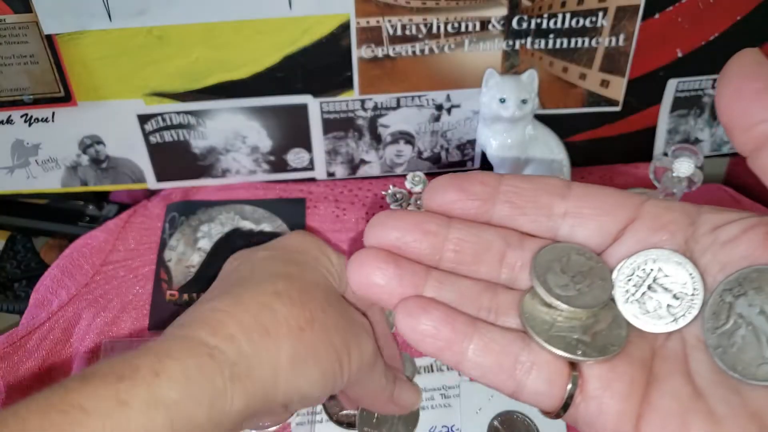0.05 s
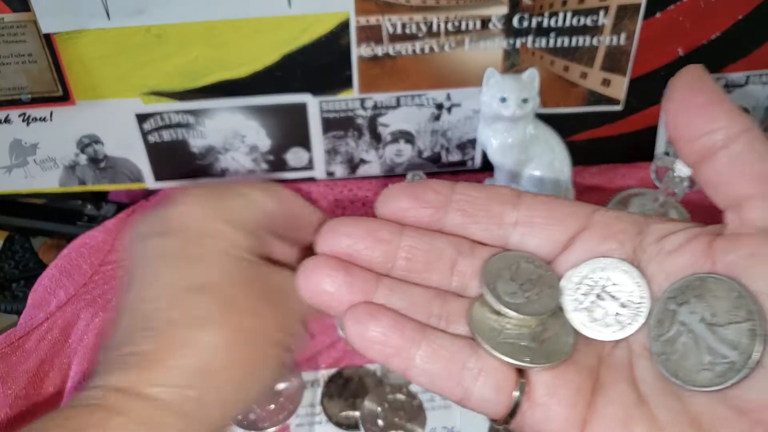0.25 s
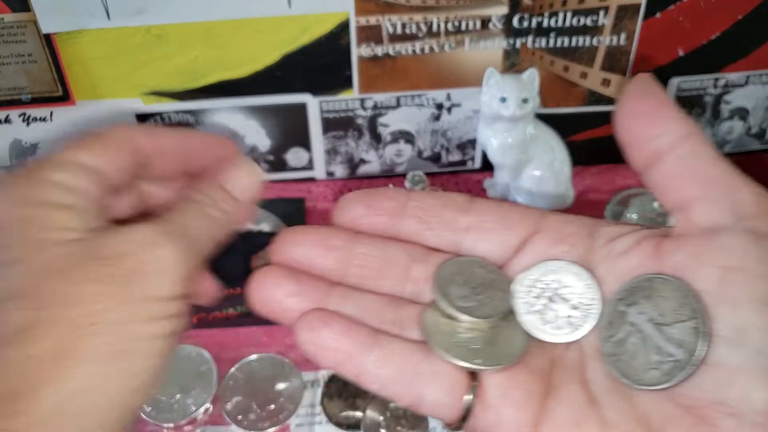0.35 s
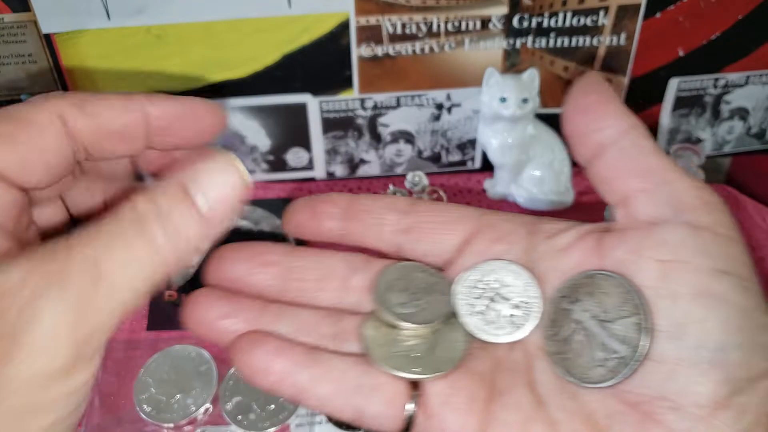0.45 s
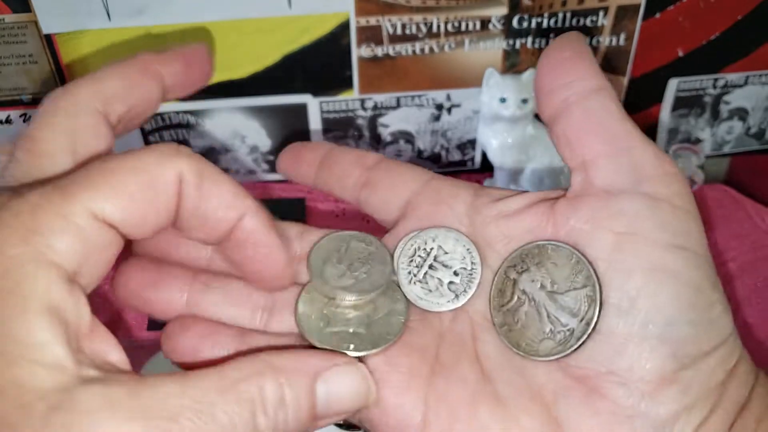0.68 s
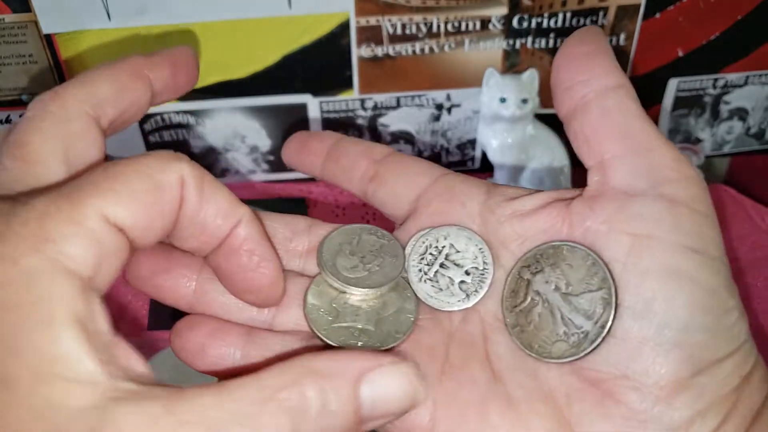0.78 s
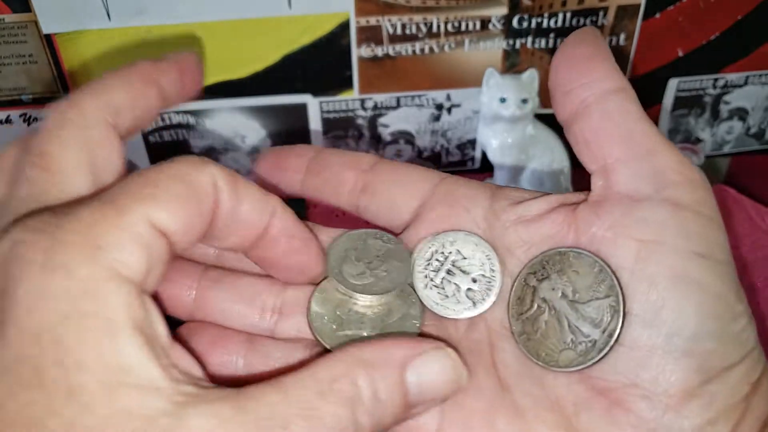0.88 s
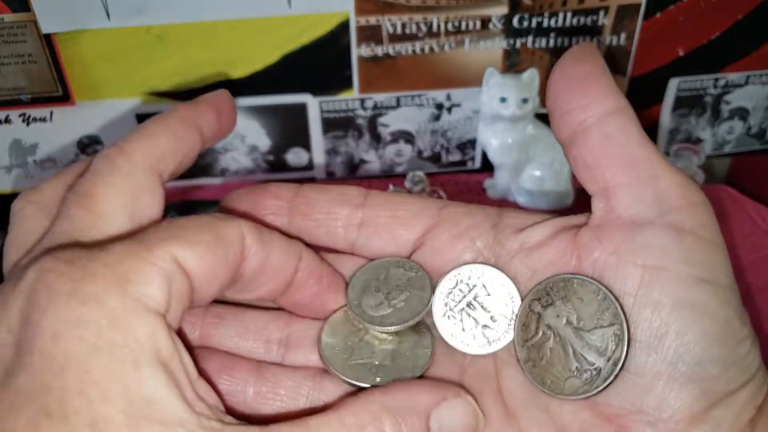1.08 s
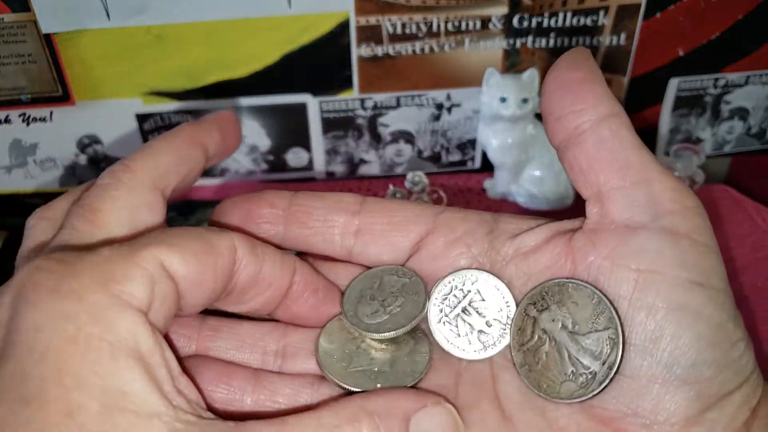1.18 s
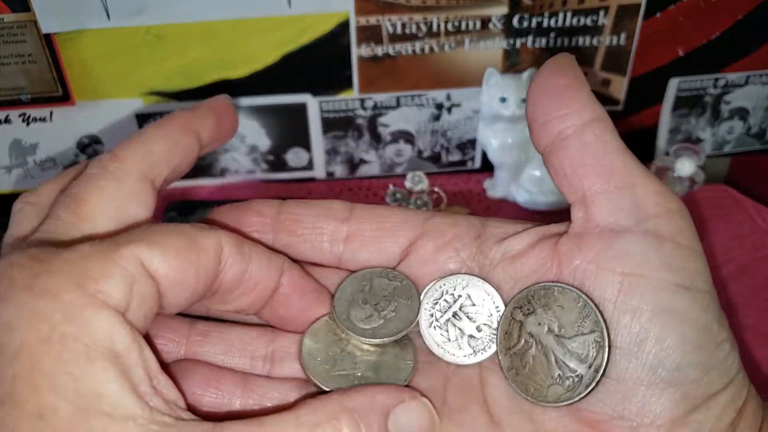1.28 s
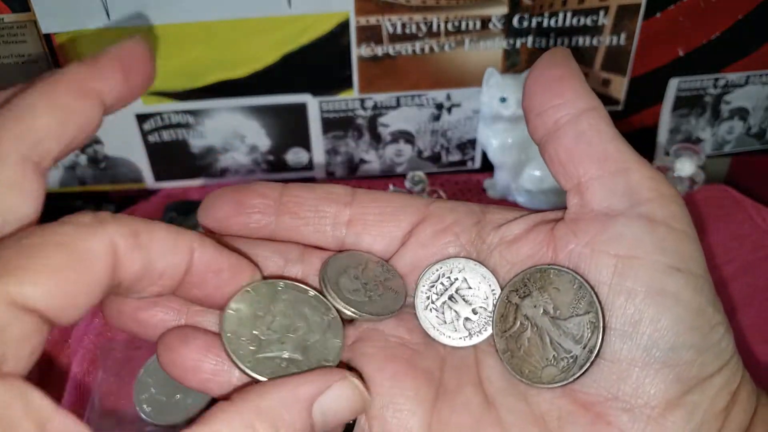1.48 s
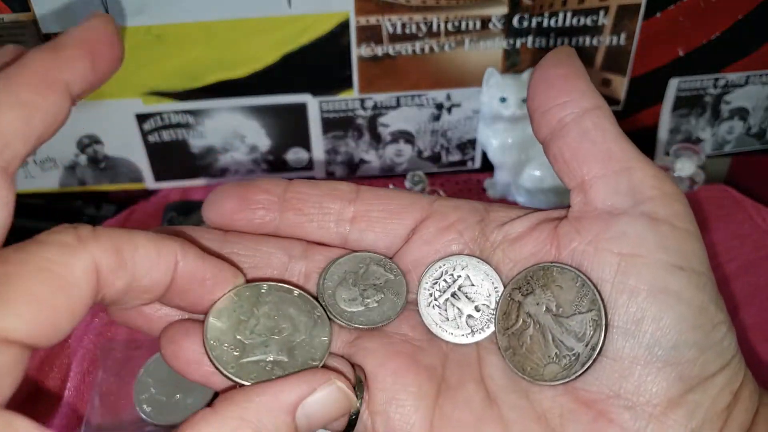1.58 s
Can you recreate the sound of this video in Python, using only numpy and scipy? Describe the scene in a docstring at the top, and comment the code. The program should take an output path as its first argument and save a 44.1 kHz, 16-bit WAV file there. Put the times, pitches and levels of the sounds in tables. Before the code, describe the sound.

Coins clink close by in a small room. At about 0.2 seconds one strikes another with a light dull knock and a bright ring, quickly stopped by fingers. From 0.7 to 1 second coins click and chatter in a palm, with faint sliding. More short, muted clicks and a soft scrape come between 1.4 and 1.6 seconds. A low rumble, faint hiss and hum continue underneath.

```python
"""In a small room, coins are sorted by hand close to a stereo microphone.
One coin strikes another, the surface below gives a dull knock, and the metal rings until the fingers
close on it. Then coins in the palm click, chatter and slide over each other, their ring cut short
by the skin. A low rumble, a faint hiss and mains hum fill the room."""
import sys
import numpy as np
from scipy import signal
from scipy.fft import rfft, irfft, next_fast_len
from scipy.io import wavfile
from scipy.ndimage import map_coordinates

SR = 44100
rng = np.random.default_rng(int(sys.argv[2]) if len(sys.argv) > 2 else 0)


def inscribe(sig):
    """Save sig as 16-bit PCM at rate SR to the path in sys.argv[1].

    A 1-D sig is mono; a 2-D sig holds one channel per row.
    Samples are clipped to [-1, 1] before scaling.
    """
    pcm = np.round(np.clip(np.atleast_2d(sig).T, -1, 1) * 32767)
    wavfile.write(sys.argv[1], SR, pcm.astype(np.int16))


N = 72765

# lead: how much earlier the left microphone hears it; pan: left minus right; room: level of the echo
STRIKE_SPOT = dict(lead_ms=0.076, pan_db=-3.5, room_db=-8.5)
PALM_SPOT = dict(lead_ms=0.13, pan_db=-0.5, room_db=-13.5)


def struck_coin():
    """Metal hits metal in a quick chatter, then rings brightly until the fingers catch it."""
    # each contact (time [s], level [dB], fade time [s])
    contacts = [(.2336, -21, .004), (.2362, -18, .002), (.2382, -15, .002), (.2415, -27, .02),
                (.2635, -30, .008), (.276, -30, .005)]
    # tone colour of a contact (frequency [Hz], relative level [dB])
    colour = [(150, -5.5), (700, -13.5), (1200, -13.5), (2500, -9), (3800, -6.5), (4650, -13.5), (5650, 7),
              (6700, -6), (9000, -8.5), (10900, -9), (12900, 10.5), (14200, -2), (15400, 2), (16200, -8)]
    # the tones the coins ring with (frequency [Hz])
    ring_hz = [5440, 5795, 7280, 9830, 9960, 12200, 12283, 12830, 13290, 15360]
    # for each of those tones (level [dB], time to fade by 60 dB [s], left minus right [dB])
    ring_tones = [(-42, .2, -2), (-40, .25, -2), (-47.5, .2, 0), (-28.5, 0.17, -6.5), (-31.5, 0.18, -6),
                  (-18.5, 0.25, 0), (-25, .13, 0), (-26, .14, -3), (-25.5, .04, -8), (-27, .22, 2)]
    start_s, caught_s, caught_fade_s, rise_s = 0.2355, 0.287, 0.022, 0.00053
    out, t = np.zeros((2, N)), np.arange(SR // 2) / SR
    for s, db, fade_s in contacts:
        add(out, s, in_room(amp(db) * contact_noise(colour, fade_s, len(t)), **STRIKE_SPOT))
    time_held = np.maximum(t - (caught_s - start_s), 0)
    for hz, (db, fade_s, pan_db) in zip(ring_hz, ring_tones):
        fade = amp(db - 60 * (t / fade_s + time_held / caught_fade_s))
        phase = 2 * np.pi * (hz * t + rng.random())
        rattle = 0.75 * wobble(190)[:len(t)]  # the coins still touch as they ring
        ring = fade * (1 - np.exp(-t / rise_s)) * np.sin(phase + rattle)
        add(out, start_s, in_room(ring, STRIKE_SPOT["lead_ms"], pan_db, room_db=-5))
    return out


def palm_coins():
    """Each touch in the palm is a short rough chatter and a ring that the skin soon stops."""
    # each touch (time [s], level [dB], chatter fade time [s], brightness [dB per octave],
    # large coin's ring [relative dB], small coin's ring [relative dB])
    touches = [(0.098, -61.5, 0.003, -21, 0, 7.5), (0.598, -94, .002, 9, -13, -8),
               (0.6787, -32.5, 0.0028, -5.5, -12, 5.5), (0.686, -30, 0.0036, -2.5, -38, -2),
               (0.7398, -23.5, 0.0038, -1.5, -21, 8.5), (0.7435, -24.5, 0.0084, 0.5, 2.5, -21),
               (.7645, -29, .002, 12, -6, 0), (0.7693, -36.5, 0.0051, -8.5, 0, -4),
               (0.778, -38, 0.0074, -10.5, -7, -14), (0.7838, -36.5, 0.0017, 9, -1, 10.5),
               (.930, -33.5, 0.0025, 18, -2, 13), (0.932, -27.5, 0.0013, -2, 2.5, -17),
               (.9422, -30.5, 0.0028, -1, 2, -18), (0.951, -41.5, 0.0054, -8, -2, 13),
               (.978, -36, 0.00067, -14, 6, 3), (0.9823, -40.5, 0.0037, 17, -21, 6),
               (0.9847, -43.5, 0.0031, -15, 12.5, -11), (1.172, -56, .004, -10.5, -16, -6),
               (1.363, -49, 0.0017, -7.5, -8, -10), (1.4, -46, 0.0027, -5, 0, -6),
               (1.4069, -29, 0.0015, -2.5, 4, 4), (1.416, -43.5, 0.0068, -11, -6, -3),
               (1.437, -44.5, .008, -9.5, -17, 2), (1.458, -45, 0.0016, -18, -4, -6),
               (1.5662, -33.5, 0.00079, 2, -27, -3), (1.57, -31.5, 0.0018, 1.5, -1.5, -21)]
    # tone colour of the chatter (frequency [Hz], relative level [dB])
    colour = [(300, -48.5), (2000, -29), (3200, -15.5), (5000, -9.5), (7000, -7), (9000, 0.5), (11000, 6),
              (13000, 1.5), (15300, 2.5), (16500, 4)]
    # each coin's tones (frequency [Hz], relative level [dB], time to fade by 60 dB [s])
    large_coin = [(5050, -21.5, 0.015), (5540, -22, 0.0098), (6145, -18, 0.024), (6950, -14.5, 0.012),
                  (8720, -19, 0.017)]
    small_coin = [(10285, -6, 0.024), (10713, -7.5, 0.025), (14790, -24, 0.051), (13710, -14, 0.02),
                  (15500, -29, 0.023)]
    out, t = np.zeros((2, N)), np.arange(SR // 2) / SR
    for s, db, fade_s, brightness, large_db, small_db in touches:
        ring = amp(large_db) * short_ring(large_coin, t) + amp(small_db) * short_ring(small_coin, t)
        chatter = contact_noise(colour, fade_s, len(t))
        tilt = lambda hz: amp(brightness * np.log2(np.clip(hz, 3000, 16000) / 10000))
        click = amp(db) * filtered(chatter + ring, tilt)
        add(out, s, in_room(click, **PALM_SPOT))
    return out


def surface_knock():
    """The strike shakes the surface below, which gives a short dull knock."""
    # the surface's tones (frequency [Hz], level [dB], time to fade by 60 dB [s])
    tones = [(258, -41.5, .05), (370, -42, 0.056), (864, -46, 0.035), (1183, -40, 0.046),
             (1820, -37, 0.019), (2605, -36.5, 0.028), (3785, -31.5, .025)]
    out, t = np.zeros(N), np.arange(SR // 2) / SR
    add(out, s=0.2358, sound=short_ring(tones, t))
    return in_room(out, **STRIKE_SPOT)


def sliding_coins():
    """Coin faces rub together in faint grainy scrapes that swell and fade."""
    # each slide (start [s], length [s], level [dB], centre frequency [Hz], width [octaves])
    slides = [(0.081, .1, -73.5, 4300, 0.38), (0.869, 0.31, -65.5, 1860, 0.095),
              (1.135, 0.16, -83.5, 6570, 0.061), (1.334, .09, -76, 8000, .7),
              (1.442, 0.088, -58, 3000, 0.37), (1.417, 0.15, -65.5, 10000, 1)]
    out, t = np.zeros(N), np.arange(N) / SR
    for s, length, db, centre_hz, octaves in slides:
        band = lambda hz: np.exp(-0.5 * (np.log2((hz + 1) / centre_hz) / octaves) ** 2)
        hiss = filtered(rng.standard_normal(N), band)
        grain = amp(3.5 * wobble(250))
        swell = np.sin(np.pi * np.clip((t - s) / length, 0, 1))
        out += amp(db) * unit(hiss * grain) * swell
    return in_room(out, **PALM_SPOT)


def room_tone():
    """The room's steady rumble and hiss, with a slightly wavering hum."""
    # tone colour of the rumble and hiss (frequency [Hz], relative level [dB])
    colour = [(24, -25.5), (40, -9), (64, -0.5), (104, -17.5), (133, -15), (215, -20.5), (243, -17),
              (269, -24.5), (503, -28.5), (630, -28.5), (751, -32), (965, -37.5), (1760, -37), (2630, -54),
              (8550, -68), (16000, -56.5)]
    # how alike left and right are (frequency [Hz], likeness [0 to 1])
    likeness = [(60, .99), (125, 0.91), (250, 0.84), (500, 0.54), (1000, 0.14), (3000, 0.199), (10000, .05)]
    # the hum's tones (frequency [Hz], level [dB])
    hum_tones = [(57.2, -47.5), (76, -54), (120, -61), (240, -61.5), (497, -70.5)]
    t, hum = np.arange(N) / SR, np.zeros(N)
    spread = lambda hz: np.arccos(along(likeness, hz)) / 2
    gains = lambda hz: amp(along(colour, hz)) * [np.cos(spread(hz)), np.sin(spread(hz))]
    middle, side = filtered(rng.standard_normal((2, N)), gains)
    for hz, db in hum_tones:
        peak = np.sqrt(2) * amp(db + 1.8 * wobble(9))
        phase = 2 * np.pi * (hz * t + rng.random()) + 0.35 * wobble(8)
        hum += peak * np.sin(phase)
    return amp(-45.5) * unit(np.array([middle + side, middle - side])) + hum


def contact_noise(colour, fade_s, size):
    """A rough contact: a burst of noise that starts at once and dies away."""
    t = np.arange(size) / SR
    gain = amp(along(colour, np.fft.rfftfreq(size, 1 / SR)))
    # build a filter with this colour that makes no sound ahead of the hit
    log_response = irfft(np.log(unit(gain)), size)
    forward_only = 1 + np.sign(size / 2 - np.arange(size)) - (t == 0)
    response = np.exp(rfft(log_response * forward_only))
    noise = rng.standard_normal(size) * np.exp(-t / fade_s)
    return irfft(rfft(noise) * response, size)


def short_ring(tones, t, detune=0.006, rise_s=0.00067):
    """Tones that build up and die quickly, at a slightly different pitch with each touch."""
    ring = np.zeros(len(t))
    for hz, db, fade_s in tones:
        pitch = hz * (1 + detune * rng.standard_normal())
        ring += amp(db - 60 * t / fade_s) * np.sin(2 * np.pi * (pitch * t + rng.random()))
    return ring * (1 - np.exp(-t / rise_s))


def in_room(x, lead_ms, pan_db, room_db):
    """Sound reaches both microphones directly, off the hands and table, and as the room's echo."""
    # how long the room echoes (frequency [Hz], time to fade by 60 dB [s])
    echo_times = [(300, 0.22), (2500, 0.46), (6000, 0.3), (10000, 0.26), (15000, 0.21)]
    echo_delay_s, echo_pan_db, near_peak_s, near_db = 0.0056, -3, 0.0026, -6
    sides = np.array([[0.5], [-0.5]])  # left, right
    direct = filtered(x, lambda hz: np.exp(2j * np.pi * hz * sides * lead_ms / 1000))
    hz, t, bands = signal.stft(rng.standard_normal((2, SR // 2)), SR, nperseg=256)
    fade = amp(-60 * t / along(echo_times, hz)[:, None])
    echo = signal.istft(bands * fade, SR, nperseg=256)[1]
    age = np.arange(echo.shape[1]) / SR
    echo *= age > echo_delay_s
    echo *= amp(room_db + echo_pan_db * sides) / np.linalg.norm(echo[0])
    near = rng.standard_normal(echo.shape) * age * np.exp(-2 * age / near_peak_s)
    near *= amp(near_db) / np.linalg.norm(near[0])
    reflected = signal.fftconvolve(x[None], echo + near, axes=1)[:, :len(x)]
    return amp(pan_db * sides) * direct + reflected


def amp(db):
    """Turn decibels into a number to multiply by."""
    return 10 ** (np.asarray(db) / 20)


def unit(x):
    """Scale to an average (rms) level of 1."""
    return x / np.sqrt(np.mean(x ** 2) + 1e-20)


def along(points, hz):
    """Read between (frequency, value) points, with octaves evenly spaced."""
    frequencies, values = np.transpose(points)
    return np.interp(np.log(hz + 1), np.log(frequencies + 1), values)


def wobble(rate):
    """A smooth curve through `rate` random points a second."""
    return map_coordinates(rng.standard_normal(N), [np.arange(N) * rate / SR], order=3)


def filtered(x, response):
    """Multiply each frequency in x by response(hz)."""
    n = x.shape[-1]
    padded = next_fast_len(n + SR // 10)
    return irfft(rfft(x, padded) * response(np.fft.rfftfreq(padded, 1 / SR)), padded)[..., :n]


def add(track, s, sound):
    """Mix a sound into the track at s seconds."""
    part = track[..., max(round(s * SR), 0):][..., :sound.shape[-1]]
    part += sound[..., :part.shape[-1]]


def scene():
    """All the coins over the room's background sound."""
    return struck_coin() + surface_knock() + palm_coins() + sliding_coins() + room_tone()


def record(dry):
    """The recorder cuts the deepest bass and the very highest treble."""
    low_cut_hz, high_cut_hz = 42, 15800
    thinned = filtered(dry, lambda hz: 1 - 1 / (1 + (hz / low_cut_hz) ** 12))
    return filtered(thinned, lambda hz: 1 / np.sqrt(1 + (hz / high_cut_hz) ** 180))


dry = scene()
out = record(dry)
inscribe(out)
```